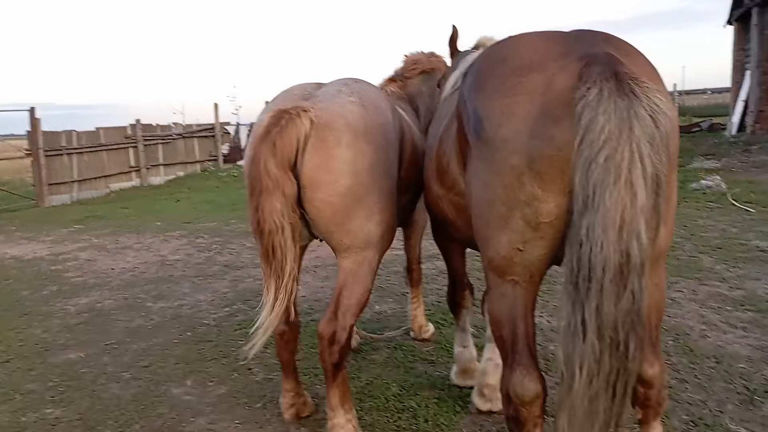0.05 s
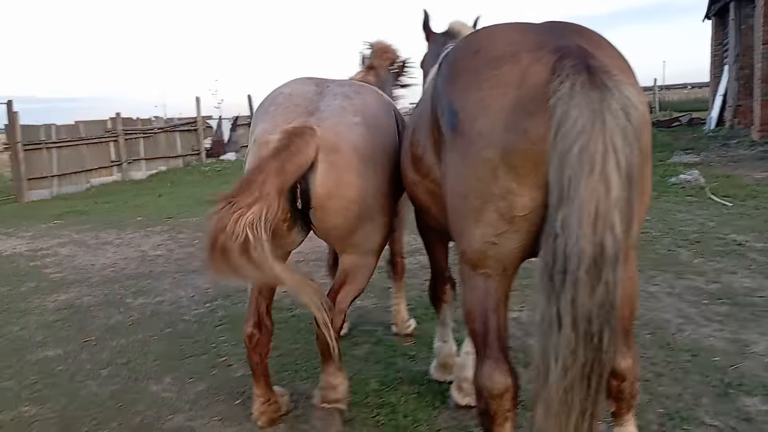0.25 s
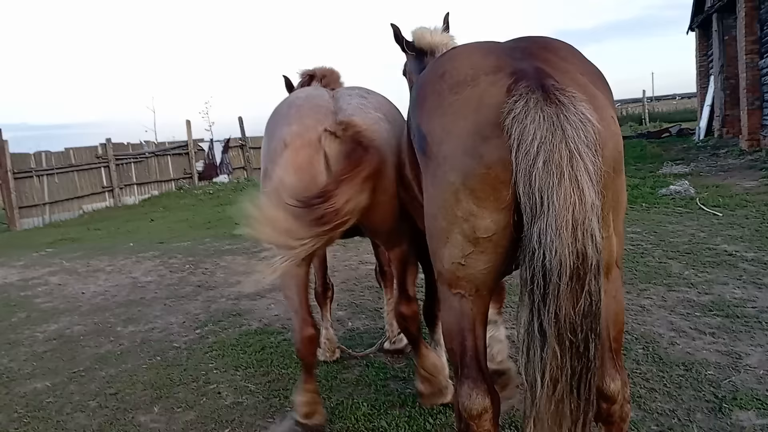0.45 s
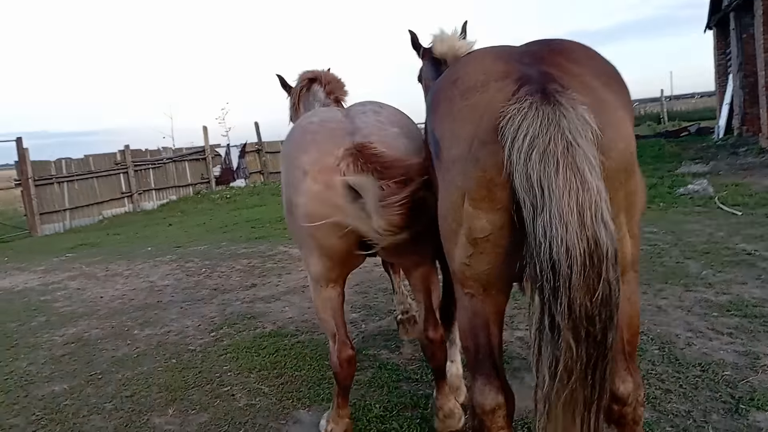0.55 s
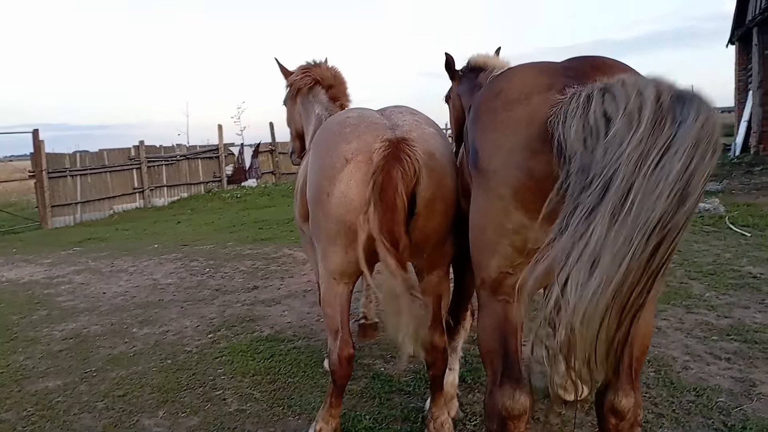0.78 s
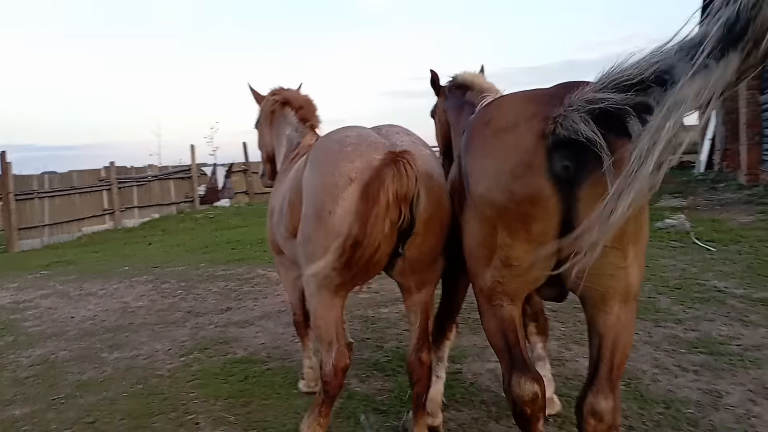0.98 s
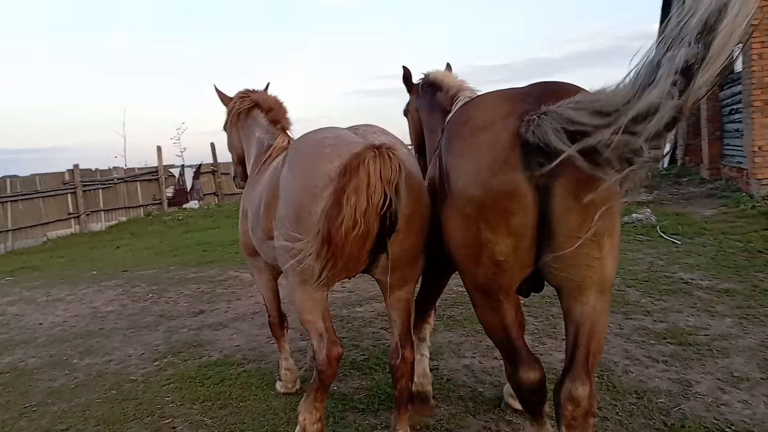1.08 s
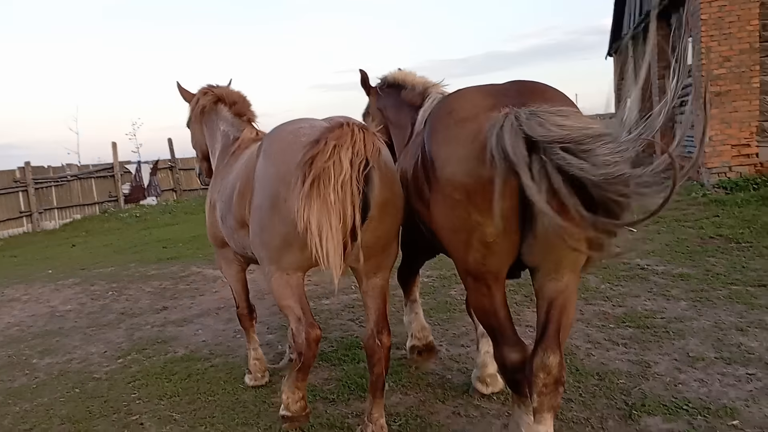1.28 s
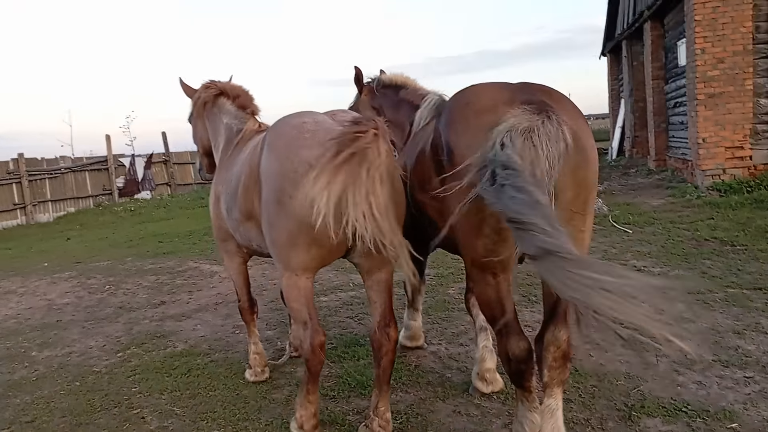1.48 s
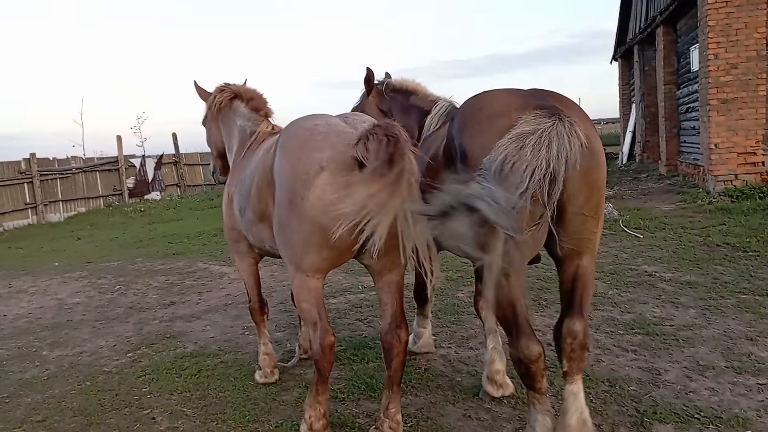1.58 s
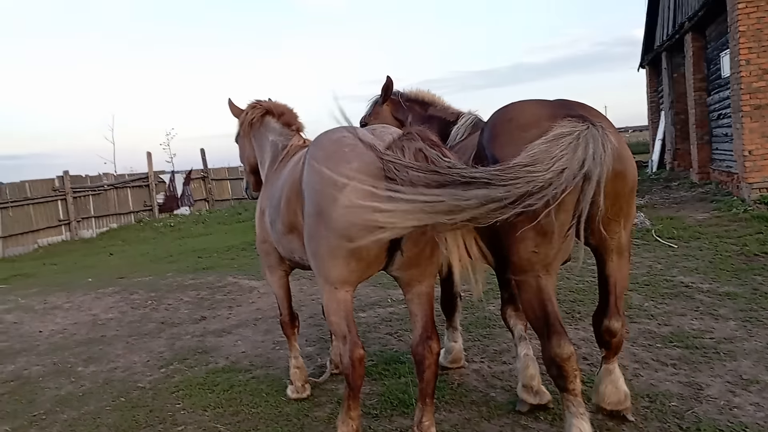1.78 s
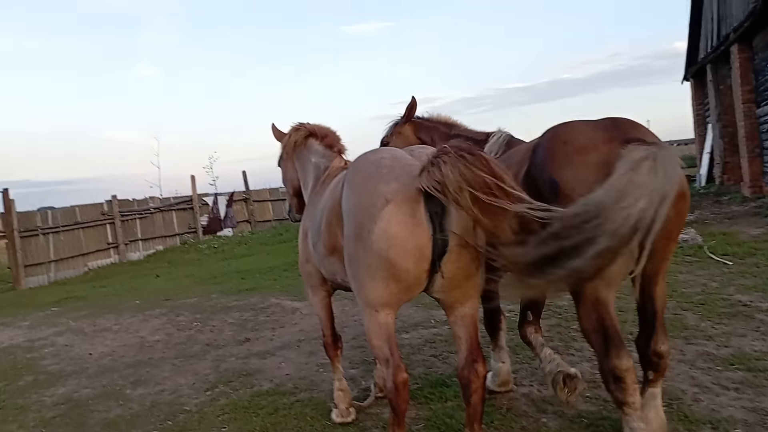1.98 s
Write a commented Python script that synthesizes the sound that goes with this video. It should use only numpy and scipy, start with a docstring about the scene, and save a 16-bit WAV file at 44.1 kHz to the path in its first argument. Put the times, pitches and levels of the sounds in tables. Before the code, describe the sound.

Short rough horse squeal fading to a thinner tone, with soft hoof thumps and faint tail swishes

```python
"""A horse squeals in an open yard a few metres from a phone. Two oscillators in its throat mix, giving sum and
difference tones; a thin high overtone of the low voice stands out and breath noise fills the same throat resonances.
Hooves ring the packed earth as decaying modes, tails swish as dense grains of noise, and small ticks sound nearby.
Barn and fence return delayed copies with a diffuse tail, over country hum, light wind and faint far tones."""
import sys
import numpy as np
from scipy import signal
from scipy.fft import rfft, irfft, next_fast_len
from scipy.io import wavfile
from scipy.ndimage import uniform_filter1d

SR = 44100
rng = np.random.default_rng(int(sys.argv[2]) if len(sys.argv) > 2 else 0)


def invert_db(x):
    """Field ratio 10**(x/20) for x, a level in decibels (scalar or array-like)."""
    u = np.asarray(x, float) / 20
    return 10 ** u


def persist_wave(psi):
    """Save psi, clipped to +-1, as 16-bit WAV."""
    counts = np.round(np.clip(psi, -1, 1) * 32767).astype(np.int16)
    wavfile.write(sys.argv[1], SR, np.atleast_2d(counts).T)


N = 90404
T = np.arange(N) / SR
SIZE = next_fast_len(N + SR)
HZ = np.arange(SIZE // 2 + 1) * SR / SIZE + 1e-3  # bin frequencies, kept above zero for logarithms

# Distant country noise. Each row: frequency in Hz, relative density in dB per Hz.
HUM_SPECTRUM = [(18, -45), (30, -16.5), (92, 2.5), (208, -5.5), (324, -14), (400, -10), (506, -6.5),
                (748, -13), (1770, -21), (2700, -32), (5610, -37), (8090, -33.5), (10500, -30.5),
                (12000, -40.5), (15600, -43)]
# Steady notes in the hum. Each row: centre in Hz, width in Hz, rise over the hum in dB.
HUM_NOTES = [(216, 23.5, 7), (416, 14, 5.5), (523, 33, 4)]
# Left-right likeness of the hum. Each row: frequency in Hz, correlation from -1 to 1.
HUM_LIKENESS = [(60, 0.91), (130, 0.98), (290, 0.93), (640, 0.87), (1410, -0.061), (3100, 0.23),
                (6820, -0.26), (15000, -0.12)]
# Colour of the hum at the two microphone openings. Each row: frequency in Hz, left minus right in dB.
HUM_BALANCE = [(60, -5.5), (110, 0), (200, -1.5), (380, -0.5), (700, -0.5), (1290, -8.5), (2380, -7.5),
               (4400, -2), (8120, -8.5), (15000, 0)]
# Colour of the yard's sounds at the two openings. Each row: frequency in Hz, left minus right in dB.
YARD_BALANCE = [(60, -8.5), (110, 1.5), (200, 0.5), (380, 3), (700, -4.5), (1290, -5.5), (2380, -9),
                (4400, 0.5), (8120, -2.5), (15000, 4.5)]
# Faint far tones. Each row: start in seconds, length in seconds, first and last pitch in Hz, peak in dB before waver.
FAR_TONES = [(0, .27, 402, 405, -57), (.865, .135, 650, 515, -53)]
# Small dry ticks. Each row: time in seconds, peak in dB, centre in Hz.
TICKS = [(.844, -53, 3000), (.845, -42, 1550), (.9185, -57, 4200), (.9185, -56, 8500)]
# Tail swishes. Each row: time of fullest swing in seconds, level in dB before the filters, rise in seconds,
# fall in seconds before a stretch, centre in Hz.
SWISHES = [(.025, -61.5, 0.013, 0.0071, 10260), (.09, -63.5, 0.016, 0.037, 11300),
           (.2, -55, 0.036, 0.027, 11500), (0.302, -45.5, 0.029, 0.057, 8900),
           (.74, -59, 0.0095, 0.018, 10000), (0.779, -60.5, 0.0037, .01, 9800),
           (.985, -60, 0.01, 0.013, 11170), (1.065, -59, 0.033, 0.025, 9100),
           (1.13, -66, 0.036, 0.05, 10000), (1.21, -57.5, .005, 0.029, 11100),
           (1.27, -61, 0.022, 0.031, 9400), (1.45, -60, 0.11, 0.21, 7600),
           (1.475, -55, 0.021, 0.022, 13740), (1.58, -61, 0.053, 0.019, 10970),
           (1.5, -59.5, 0.094, 0.12, 3900), (1.802, -66.5, 0.064, 0.027, 7970),
           (1.99, -66, 0.029, .03, 10800)]
# Colour of brushing hair. Each row: frequency in Hz, gain in dB before make-up.
HAIR_COLOUR = [(3000, -8), (6000, -10), (9300, 0), (10800, -1), (12500, -7), (15600, -9)]
# Hooves on earth. Each row: start in seconds, ring peak in dB, hardness in dB per octave, scuff in dB.
HOOVES = [(0.292, -25, -4.5, -63), (0.354, -30.5, -26, -62), (.553, -31, -12, -54), (0.575, -23.5, 6, -50),
          (0.673, -38, -3.5, -63), (0.883, -40.5, -1, -68.5), (1.602, -39.5, -19, -66),
          (1.999, -28, 7, -66.5)]
# Modes of the ground under a hoof. Each row: frequency in Hz, level in dB before hardness, T60 in seconds.
EARTH_MODES = [(81, -47, 0.064), (102.2, 4.5, 0.089), (168.5, 9, 0.034), (223, -12.5, 0.015),
               (469, -8.5, 0.03)]
# Echoes off barn and fence. Each row: delay in seconds, level in dB, lead of the left opening in seconds.
ECHOES = [(.011, -14, -.0004), (.034, -22, .0004), (.062, -27, -.0003)]
# Breath. Each row: time in seconds, level in dB before flutter.
BREATH_LEVEL = [(.1, -73), (.16, -55), (.24, -44), (.29, -43), (.34, -37.5), (.43, -39), (.55, -47),
                (.63, -49), (.78, -62), (.95, -70)]
# Resonances of the throat. Each row: frequency in Hz, gain in dB.
THROAT = [(300, 8), (480, 10.5), (660, -1), (860, -6.5), (1020, -3), (1270, 2), (1500, 3), (1720, 7),
          (1950, 10), (2250, -2), (2650, -15), (3200, -5.5), (3850, -10), (4490, -9), (5400, -13.5),
          (6800, -20), (9500, -17.5), (12000, -29), (15500, -47)]
# Low voice, before the throat. Each row: time in seconds, pitch in Hz, level in dB, roughness from 0 to 1,
# extra gain of the first order in dB, extra gain of the second order in dB.
LOW_VOICE = [(.1, 800, -80, .15, 19, -12), (.13, 985, -64, .3, 21, -10), (.143, 830, -65, .15, 15, -12),
             (.158, 635, -51, .2, -4, -18), (.19, 625, -49, 0.45, 6, -16), (.22, 630.2, -46, 0.25, -8, -15),
             (.252, 651.3, -41.5, 0.06, -0.5, -11), (.275, 644.6, -53, 0.2, 8, 14.5),
             (.31, 636.4, -43, 0.03, 4.5, 5.5), (.345, 653.7, -36, 0.14, 8, 4.5),
             (.38, 653, -37.5, 0.09, 1, 6.5), (.4, 634.4, -38.5, 0.2, 4, 7.5),
             (.43, 605, -42.5, 0.25, 10.5, 9.5), (.46, 604, -42.5, 0.2, -4.5, 5.5),
             (.5, 603, -38.5, .2, -9, 1), (.525, 621, -43.5, 0.25, -5, 3.5),
             (.56, 630.5, -47.5, 0.54, -30, -2), (.6, 625, -50, .5, -10, 3), (.63, 619, -55, 0.35, -5, 10),
             (.66, 604, -77, 0.65, -4, 7)]
# Harmonics of the low voice. Each entry: gain of one order in dB, from the first upward.
LOW_ORDERS_DB = [0.5, 1, 2, -0.5, -4, -6, -11, -14, -10, -8, -12, -9]
# High voice, before the throat. Each row: time in seconds, pitch in Hz, level in dB, roughness from 0 to 1,
# extra gain of the first order in dB.
HIGH_VOICE = [(.135, 1034, -75, 0.18, 0), (.15, 1077, -54, .1, 0.5), (.165, 1120, -46, 0.2, 3),
              (.19, 1163, -53.5, 0.36, 10), (.22, 1243, -55.5, 0.16, 14), (.25, 1285, -65.5, 0.42, 22),
              (.3, 679.7, -88, .4, 28), (.325, 694.8, -50, 0.3, 22.5), (.37, 680.5, -46, 0.38, 23),
              (.435, 710.4, -56, 0.26, 26.5), (.46, 743, -63, 0.55, 18.5), (.5, 817.5, -48, 0.1, 12),
              (.55, 854, -43.5, 0.06, 5), (.605, 890, -35, 0.25, -11), (.64, 838.4, -33.5, 0, -22),
              (.666, 858, -36, .04, -14), (.673, 860, -54, .1, -5), (.685, 870, -40, .08, -12),
              (.699, 860, -62, .1, -10), (.707, 858, -42.5, 0, -30), (.77, 892, -44, 0.22, -37),
              (.788, 902, -55, .2, -28), (.8, 915, -66, .3, -25), (.84, 930, -67, .3, -20),
              (.855, 852, -70, .3, -15), (.88, 850, -62.5, 0.2, -18), (.9, 879, -79, .3, -15)]
# Harmonics of the high voice. Each entry: gain of one order in dB, from the first upward.
HIGH_ORDERS_DB = [2.5, -1, -16, -11]
# High overtone of the low voice, before the throat. Each row: time in seconds, level in dB, roughness from 0 to 1,
# gain of the line an octave below in dB.
HIGH_OVERTONE = [(.225, -75, .2, -25), (.245, -39, .15, -25), (.28, -42, .2, -25), (.325, -36, 0.1, -6),
                 (.34, -48, .2, -30), (.37, -45, .25, -25), (.42, -50, .3, -25), (.45, -70, .4, -25)]
# Alternation of strong and weak beats in the low voice. Each row: time in seconds, strength in dB.
HALVING = [(.27, -28), (.31, -8), (.34, -12), (.4, -5), (.5, -8), (.62, -5)]
# How hard the high voice pumps the low one. Each row: time in seconds, strength in dB.
MIXING = [(.12, -20), (.2, -1), (.27, -25), (.33, -29), (.4, -12), (.46, -13), (.55, -26), (.65, -2)]

LEFT_LEAD_S = 0.00012  # the voice reaches the left opening first


def over_hz(table):
    """Interpolation on a logarithmic frequency axis: a (Hz, value) table read at every bin."""
    hz, value = np.array(table, float).T
    return np.interp(np.log(HZ), np.log(hz), value)


def over_time(table):
    """Linear interpolation in time: a (seconds, value) table read at every sample."""
    return np.interp(T, *np.array(table).T)


def shape(x, gain):
    """Linear filtering: the spectrum is multiplied by a gain per bin."""
    return irfft(rfft(x, SIZE) * gain, SIZE)[..., :N]


def unit(x):
    """Normalisation to an rms of 1."""
    return x / np.sqrt(np.mean(x ** 2))


def wobble(rate_hz):
    """Low-passed noise: a random drift of spread 1, mostly slower than rate_hz."""
    return unit(shape(rng.standard_normal(N), np.exp(-(HZ / rate_hz) ** 2)))


def ports(x, lead_s, balance):
    """Spaced receivers: two microphone openings differ in arrival time and colour."""
    # sound bends round the phone, so the lead shrinks above 1700 Hz
    lead = lead_s / np.hypot(1, HZ / 1700)
    half = invert_db(over_hz(balance) / 2) * np.exp(1j * np.pi * HZ * lead)
    return shape(x, np.array([half, 1 / half]))


def wind():
    """Low-frequency pressure noise: light wind rumbles independently at each opening."""
    level_db, corner_hz = -73, 68.4
    return invert_db(level_db) * unit(shape(rng.standard_normal((2, N)), 1 / (1 + (HZ / corner_hz) ** 3)))


def hum():
    """Partly coherent noise: bands of country hum swell together, flicker alone and are alike in the bass."""
    level_db, swell_db, flicker_db = -50, 1, 0.5
    notes_db = sum(db * np.exp(-((HZ - hz) / width) ** 2) for hz, width, db in HUM_NOTES)
    alike = np.clip(over_hz(HUM_LIKENESS), -.9, .99)
    noise = rfft(rng.standard_normal((2, SIZE)))
    mid, side = noise * np.sqrt([1 + alike, 1 - alike]) * invert_db(over_hz(HUM_SPECTRUM) + notes_db)
    half = invert_db(over_hz(HUM_BALANCE) / 2)
    both = np.array([(mid + side) * half, (mid - side) / half])
    swell = swell_db * wobble(1.5)
    out = 0
    for octave in np.arange(5, 14.1, .5):  # overlapping bands centred on 2 ** octave Hz
        band = np.cos(np.pi * np.clip(np.log2(HZ) - octave, -.5, .5)) ** 2
        # the flicker weakens toward the treble
        flicker = flicker_db * wobble(3.3) * np.clip((11 - octave) / 4, .3, 1)
        out = out + irfft(both * band, SIZE)[:, :N] * invert_db(swell + flicker)
    return invert_db(level_db) * unit(out)


def far_tones():
    """Frequency and amplitude modulation: faint tones glide in pitch and waver in level."""
    waver, waver_hz = .4, 40
    out = np.zeros(N)
    for s, length, first_hz, last_hz, db in FAR_TONES:
        u = np.clip((T - s) / length, 0, 1)
        hz = last_hz + (first_hz - last_hz) * (1 - u) ** 2
        envelope = (1 + waver * wobble(waver_hz)) * np.sin(np.pi * u) ** 0.22
        out += invert_db(db) * envelope * np.sin(2 * np.pi * np.cumsum(hz) / SR)
    return out


def ticks():
    """Band-limited impulse: each tick is a short wave packet with a little grit."""
    octaves, grit = .45, .1
    out = np.zeros(N)
    for s, db, hz in TICKS:
        snap = np.exp(-2j * np.pi * HZ * s - (np.log2(HZ / hz) / octaves) ** 2)
        burst = irfft(snap, SIZE)[:N] * (1 + grit * rng.standard_normal(N))
        out += invert_db(db) * burst / np.abs(burst).max()
    return out


def tails():
    """Granular friction noise: hair strands brush past each other in dense grains, unrelated left and right."""
    strands_per_s, spread_db, octaves = 1300, -3, 0.67
    struck = rng.random((2, N)) < strands_per_s / SR
    grains = struck * invert_db(spread_db * rng.exponential(size=(2, N)))
    density = uniform_filter1d(grains, size=40) + 0.034  # a floor of noise between grains
    hair = unit(density * rng.standard_normal((2, N)))
    out = 0
    for s, db, rise, fall, hz in SWISHES:
        swing = np.exp(-((T - s) / np.where(T < s, rise, 1.12 * fall)) ** 2)
        out = out + invert_db(db) * shape(hair * swing, np.exp(-(np.log2(HZ / hz) / octaves) ** 2))
    return shape(out, 2.24 * invert_db(over_hz(HAIR_COLOUR)))


def hooves():
    """Modal impact: each step rings the ground, harder steps in its upper modes, and scuffs a little dust."""
    dust_hz, onset_s = 9500, 0.0024
    dust = unit(shape(rng.standard_normal(N), np.exp(-np.log2(HZ / dust_hz) ** 2 / .2)))
    out = np.zeros(N)
    for s, db, hard_db, scuff_db in HOOVES:
        u = np.maximum(T - s, 0)
        ring = np.zeros(N)
        for hz, mode_db, t60 in EARTH_MODES:
            gain = invert_db(mode_db + hard_db * np.log2(hz / EARTH_MODES[1][0]))  # tilted about the second mode
            ring += gain * np.sin(2 * np.pi * hz * u) * 1000. ** (-u / t60)
        ring *= 1 - np.exp(-(u / onset_s) ** 2)
        scuff = dust * np.exp(-((T - s - .005) / .008) ** 2)
        out += invert_db(db) * ring / np.abs(ring).max() + invert_db(scuff_db) * scuff
    return out


def breath():
    """Turbulent flow noise: air rushes through the throat, scattered by the yard so that the sides partly differ."""
    tilt_db_per_octave, side_gain, side_low_hz = 3.5, .7, 600
    tilt = (HZ / 1000) ** (tilt_db_per_octave / np.log10(4) / 10)
    mid, side = unit(shape(rng.standard_normal((2, N)), tilt * invert_db(over_hz(THROAT))))
    level_db = np.interp(T, *np.array(BREATH_LEVEL).T, left=-120, right=-120)
    size = invert_db(level_db + 2.06 * wobble(26))
    spread = shape(side * size, 1 / (1 + (side_low_hz / HZ) ** 4))
    direct = ports(mid * size, LEFT_LEAD_S, YARD_BALANCE)
    return direct + side_gain * ports(spread, 0, YARD_BALANCE) * [[1], [-1]]


def oscillator(table, orders_db):
    """Fourier series of an oscillator: roughness shakes pitch and the size of each order."""
    flutter_hz, jitter = 118, 0.0066  # speed of the roughness; pitch scatter at full roughness
    rougher_per_order = .04  # above the third order
    times, *columns = np.array(table, float).T
    hz, db, rough, *shift_db = (np.interp(T, times, column) for column in columns)
    rough = np.clip(rough, 0, 1)
    sounding = (T > times[0]) & (T < times[-1])
    phase = 2 * np.pi * np.cumsum(hz * (1 + jitter * rough * wobble(flutter_hz))) / SR
    out = 0
    for k, order_db in enumerate(orders_db):
        r = np.clip(rough + rougher_per_order * max(k - 2, 0) * (rough > .09), 0, 1)
        # a steady part gives way to a randomly turning one
        shake = np.sqrt(1 - r) + np.sqrt(r / 2) * (wobble(flutter_hz) + 1j * wobble(flutter_hz))
        own_db = shift_db[k] if k < len(shift_db) else 0
        out = out + invert_db(order_db + own_db) * np.real(shake * np.exp(1j * (k + 1) * phase))
    return np.sqrt(2) * sounding * invert_db(db) * out, phase


def high_overtone():
    """Harmonic pair: a thin line near 4490 Hz, a high overtone of the low voice, with a weaker one an octave below."""
    lower_hz = 2243
    rows = [(s, lower_hz, *rest) for s, *rest in HIGH_OVERTONE]
    return oscillator(rows, [0, 0])[0]


def halved_beats(low, phase):
    """Period doubling: alternating strong and weak beats add lines halfway between the upper orders."""
    low_hz = 2300  # the added lines are heard above this
    alternating = 2 * low * invert_db(over_time(HALVING)) * np.cos(phase / 2)
    return shape(alternating, 1 / (1 + (low_hz / HZ) ** 8))


def mixing_tones(low, phase):
    """Amplitude modulation: the high voice pumps the low one, making sum and difference tones."""
    low_hz = 1040  # the tones radiate above this
    pump = invert_db(over_time(MIXING)) * (np.cos(phase) + 0.98 * np.cos(2 * phase))
    return shape(2 * low * pump, 1 / (1 + (low_hz / HZ) ** 4))


def squeal():
    """Source and filter: both voices, their mixing and the high overtone pass through the throat resonances."""
    low, low_phase = oscillator(LOW_VOICE, LOW_ORDERS_DB)
    overtone = high_overtone()
    high, high_phase = oscillator(HIGH_VOICE, HIGH_ORDERS_DB)
    source = low + halved_beats(low, low_phase) + mixing_tones(low, high_phase) + high + overtone
    return shape(source, invert_db(over_hz(THROAT)))


def diffuse(t60, start):
    """Exponential decay: spectrum of a noise tail of unit energy, unrelated left and right."""
    u = T[:SR // 2]
    tail = rng.standard_normal((2, len(u))) * 1000. ** (-u / t60) * (u > start)
    return rfft(tail / np.sqrt(np.sum(tail ** 2, axis=1, keepdims=True)), SIZE)


def reflections(voice):
    """Delay and scattering: discrete echoes off barn and fence, then diffuse tails."""
    out = 0
    for delay, db, lead in ECHOES:
        late = shape(voice, np.exp(-2j * np.pi * HZ * delay))
        out = out + invert_db(db) * ports(late, lead, YARD_BALANCE)
    # scatter off the two bodies and the ground, weak in the bass
    close = invert_db(-2) * diffuse(.05, 0.0014) / (1 + (900 / HZ) ** 2)
    yard = invert_db(-17) * diffuse(0.25, 0.016)
    return out + shape(ports(voice, 0, YARD_BALANCE), close + yard)


def scene():
    """Superposition: direct sounds, reflections of the voice and the background add linearly."""
    voice = squeal()
    near = hooves() + ticks() + far_tones()
    direct = ports(voice, LEFT_LEAD_S, YARD_BALANCE) + ports(near, 0, YARD_BALANCE)
    return direct + reflections(voice) + breath() + tails() + hum() + wind()


def top_cut(x):
    """Nothing passes above the cut-off."""
    return signal.sosfilt(signal.butter(12, 15700, fs=SR, output="sos"), x)


def record(dry):
    """Saturation and high-pass filtering: the phone rounds the loudest peaks and cuts the deepest bass."""
    ceiling, bass_cut_hz = 0.38, 50  # ceiling as a share of full scale
    rounded = ceiling * np.tanh(dry / ceiling)
    mix = shape(rounded, 1 / (1 + (bass_cut_hz / HZ) ** 6))
    return top_cut(mix)


dry = scene()
out = record(dry)
persist_wave(out)
```